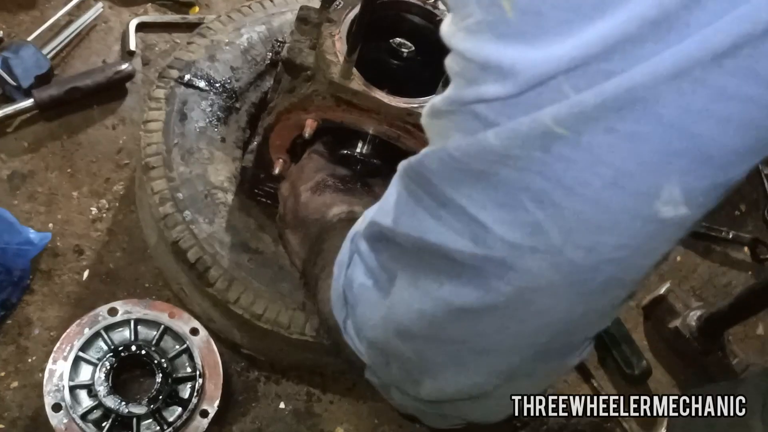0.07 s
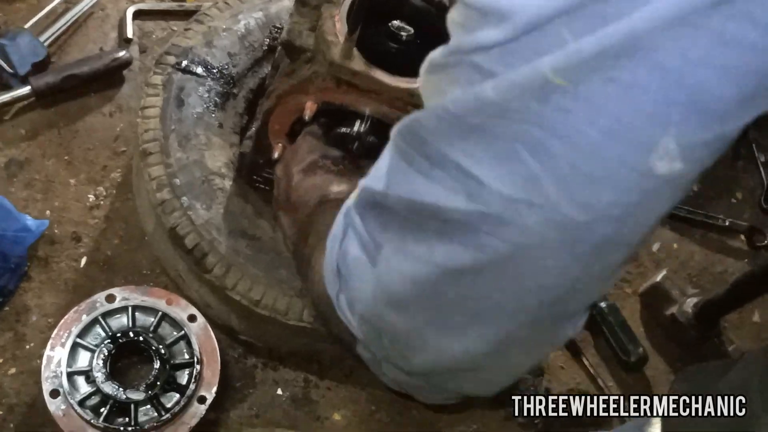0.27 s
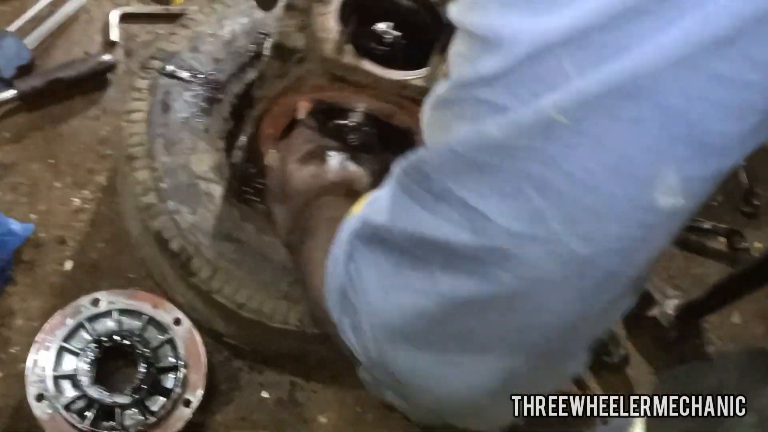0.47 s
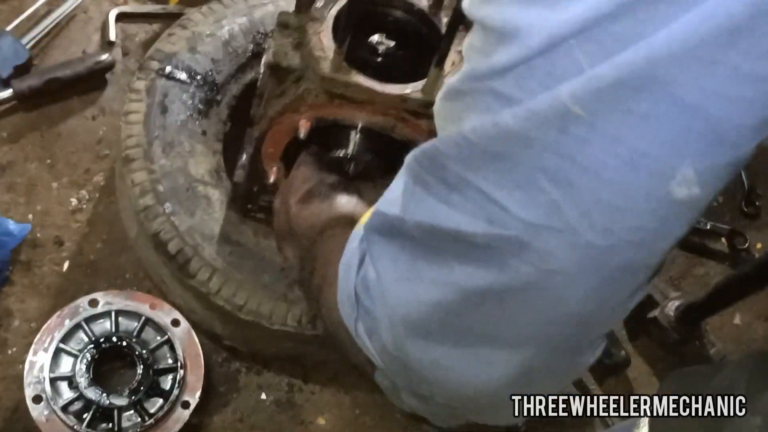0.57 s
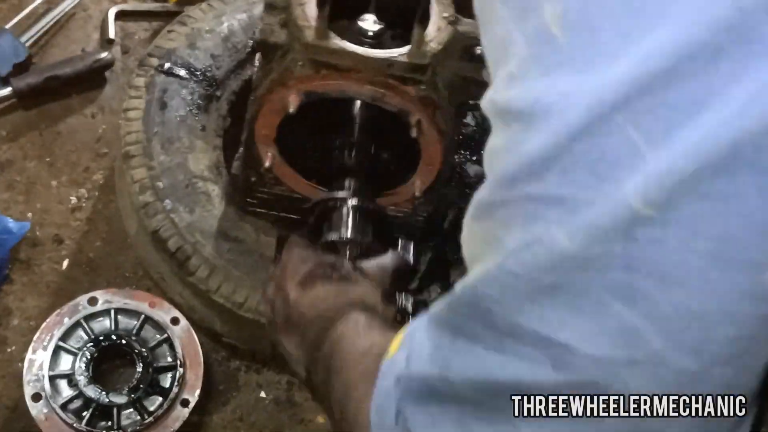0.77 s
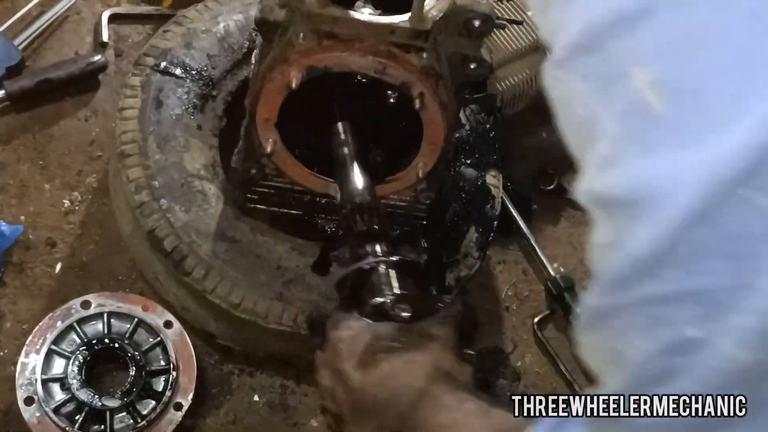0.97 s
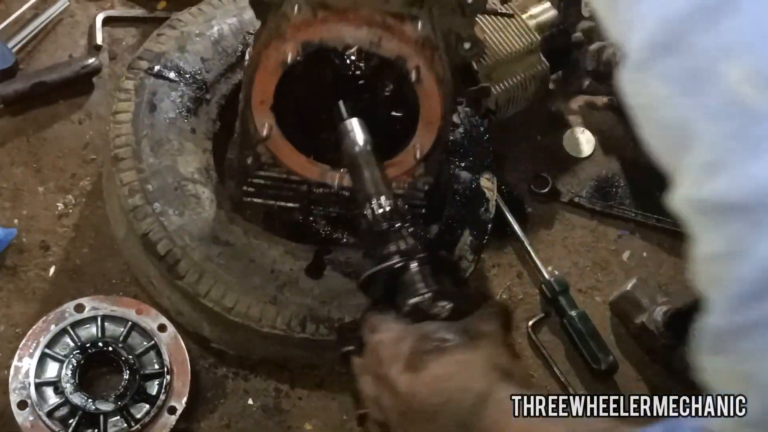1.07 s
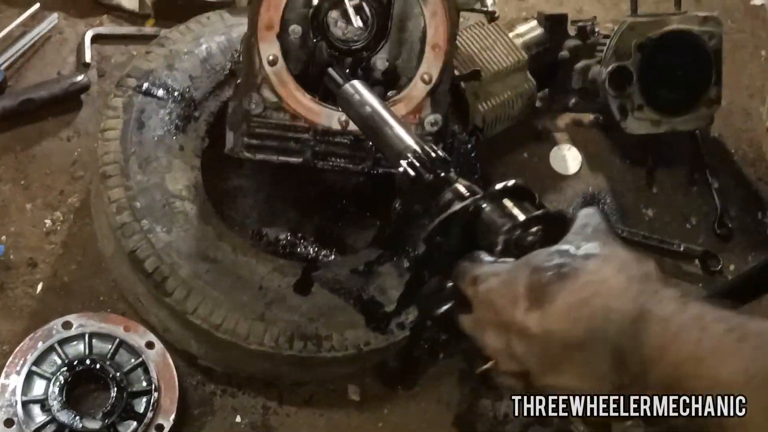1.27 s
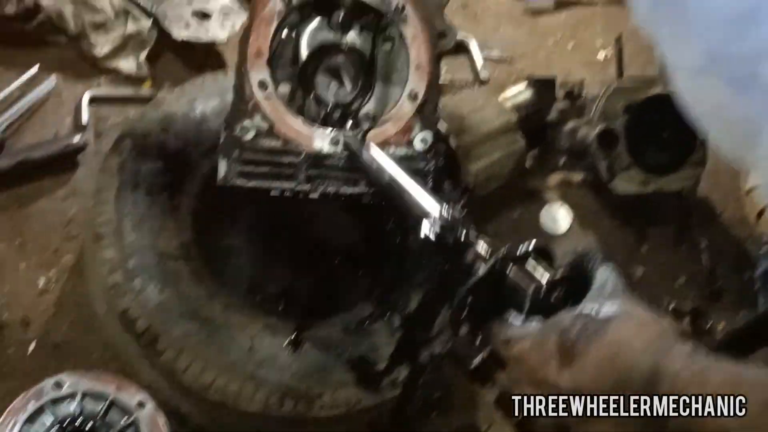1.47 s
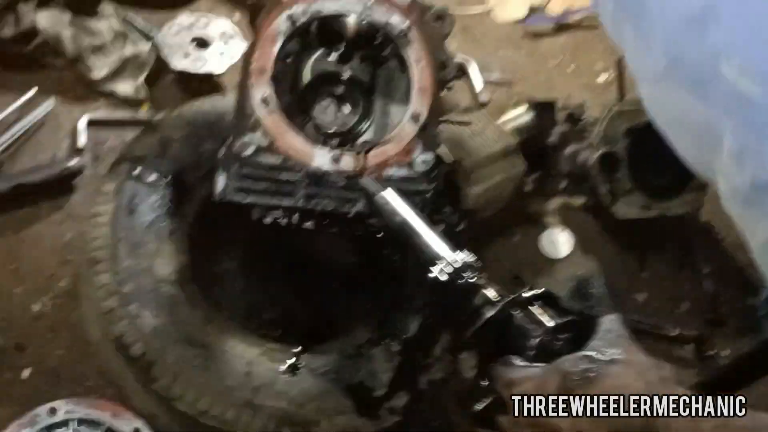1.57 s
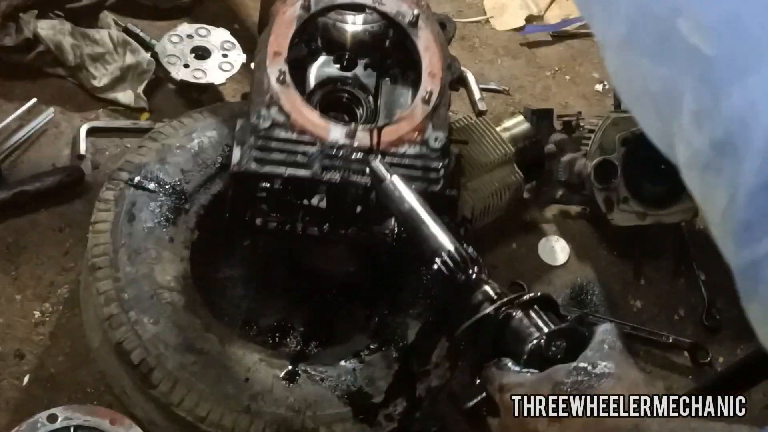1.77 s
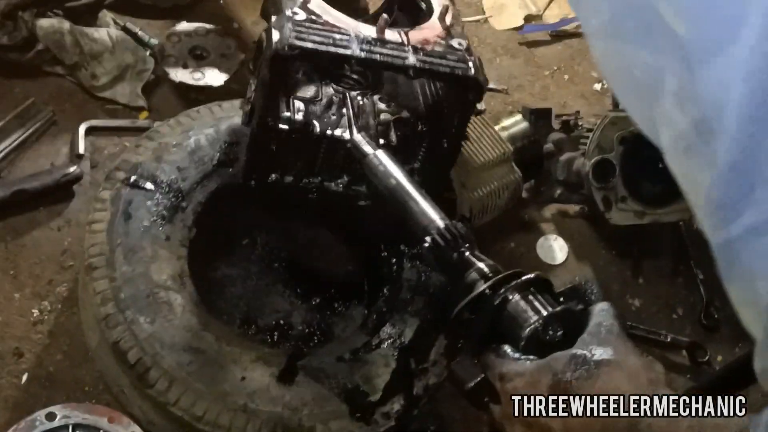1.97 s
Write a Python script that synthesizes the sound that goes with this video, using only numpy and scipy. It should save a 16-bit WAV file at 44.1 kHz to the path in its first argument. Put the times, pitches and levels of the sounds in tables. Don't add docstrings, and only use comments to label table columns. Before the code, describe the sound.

Steel gear parts and a shaft clank loudly against a casing in a quick cluster, then quiet ticks, a small knock and gritty scraping; close phone microphone, open workshop, faint distant engine and bird.

```python
import sys
import numpy as np
from scipy import signal
from scipy.fft import rfft, irfft, next_fast_len
from scipy.io import wavfile
from scipy.ndimage import uniform_filter1d

SR = 44100
rng = np.random.default_rng(int(sys.argv[2]) if len(sys.argv) > 2 else 0)


def master_out(mix):
    frames = np.transpose(np.atleast_2d(mix))
    ceiling = np.clip(frames, -1, 1)
    pcm = np.round(ceiling * 32767).astype(np.int16)
    wavfile.write(sys.argv[1], SR, pcm)


def level_to_linear(level):
    exponent = np.asarray(level, float) / 20
    return 10 ** exponent


N = 88949

# [f/Hz, level/dB, T60/s]
CLUSTER_MODES = [(273, 0, 0.14), (725, -6.5, 0.125), (1652, 2.5, 0.093), (1870, -3, 0.11),
                 (2126, 1.5, 0.068), (2435, -6, 0.16), (2827, -12, 0.2), (4170, -8, 0.11), (4584, -2, .15),
                 (5580, -11, 0.14), (6340, -15, 0.13), (9900, -18.5, 0.13), (10560, -19, .12),
                 (13140, -25.5, .12)]
CASING_MODES = [(272, 0.5, 0.073), (555, -1.5, 0.068), (756, -1.5, 0.076), (833, 5, 0.055),
                (957, -5.5, 0.055), (1065, -4.5, .1), (1210, -18.5, 0.83), (1248, -4.5, .1),
                (1590, -7, 0.14), (1952, -5, 0.076), (2783, 0, 0.065), (2863, -0.5, 0.14), (3000, -8, 0.12),
                (3425, -14.5, 0.15)]
RIB_MODES = [(2400, -4, 0.038), (3220, -13, 0.12), (4258, -7.5, 0.1), (4660, -10, 0.048),
             (6110, -19.5, 0.089), (7000, -42, 0.18), (8371, -31.5, 0.25), (9620, -26.5, 0.13),
             (10100, -23.5, 0.13), (11700, -26.5, 0.07), (13170, -24.5, 0.078)]
GEAR_MODES = [(269.5, -3, .13), (724, -0.5, 0.034), (862, -3.5, 0.08), (1073, -2.5, 0.073),
              (1648, 5.5, 0.025), (2717, -3.5, 0.077), (4585, -9, 0.037)]
SPLINE_MODES = [(285.5, -21, 0.85), (894, -16.5, 0.27), (1614, 1.5, 0.14), (2385, -15.5, 0.13),
                (2740, -15.5, 0.073), (3448, -7.5, 1), (3940, -16.5, 0.088), (4370, -17.5, 0.073),
                (8040, -21, 0.23), (9800, -13.5, 0.2), (10250, -20, 0.089), (13150, -29, 0.25)]
SHAFT_MODES = [(870, -18, 0.29), (1570, -11, 0.73), (2040, 0, 0.023), (2229, -19, 0.42),
               (2340, -2.5, 0.021), (3610, -14, 0.086), (3438, -2.5, 0.28), (4160, -26, 0.24),
               (4226, -19, 0.16), (5600, -16, 0.08), (6470, -10, 0.041), (8430, -17, 0.17),
               (10400, -22, 0.15), (13300, -28.5, 0.1)]
BLOCK_MODES = [(319.5, 2, 0.04), (583, -7, 0.081), (901, -8, 0.052), (1585, -2.5, 0.055),
               (1723, -2.5, 0.05), (1952, 7.5, 0.022), (2715, 9, 0.061), (3340, 2, 0.052),
               (3500, -5, 0.063), (4120, 0, 0.048), (4417, -0.5, 0.037), (4650, 2.5, .05)]
WASHER_MODES = [(8600, 3, 0.042), (9520, 4, 0.066), (11100, 0, 0.07), (12000, -5, 0.15), (12900, -9, .05)]
# [t/s, ring level/dB, clatter level/dB, clatter T60/s, hardness/(dB per octave)]
CLUSTER_BLOWS = [
    (0, -25, -19.5, 0.45, 0.5),
    (.018, -27, -17, 0.24, -1),
]
CASING_BLOWS = [
    (.09, -46, -36, .08, 0),
    (.1188, -17, -8, .115, 0),
]
GEAR_BLOWS = [
    (.231, -35.5, -33.5, 0.087, 8),
    (0.2374, -21.5, -19, 0.15, 0.5),
    (0.2875, -34, -26.5, 0.062, -1.5),
    (0.328, -47, -28, 0.14, 5),
]
SPLINE_BLOWS = [
    (0.4487, -38, -22, .04, 6),
    (.4655, -22, -26, 0.11, 3),
    (.488, -27, -27, 0.08, 3),
]
SHAFT_BLOWS = [
    (.5195, -21, -17, .045, 2),
]
BLOCK_BLOWS = [
    (0.962, -57.5, -42.5, 0.089, 0),
    (1.4239, -40, -24.5, 0.059, -0.44),
    (1.716, -55.5, -35, 0.31, 0.46),
]
WASHER_BLOWS = [
    (0.756, -74, -84, .03, 6),
    (.927, -58, -67, 0.044, 7.1),
    (.961, -56.5, -66.5, .04, 6.8),
]
# [t/s], in the order cluster, casing, gears, splines, shaft, block, washer
LAST_FREE_S = [0.021, 0.16, 0.052, 0.066, 0.14, 0.029, 0.03]
PARTNER_STRENGTH = [1.5, 2.2, 1.5, .6, .3, 2, 1]
# [t/s, f/Hz, level/dB, T60/s, free ringing/s]
PINGS = [(0.29, 2229, -35, 0.26, 0.028), (0.312, 4550, -39, 0.15, 0.015), (0.341, 3445, -46, 1, 0.19),
         (0.394, 1640, -37.5, 0.19, 0.026), (0.435, 1590, -34, 0.2, 0.0097),
         (0.449, 2380, -16.5, 0.015, .02), (0.307, 1581, -43, 0.39, 0.063), (.409, 3500, -41, 0.091, 0.016),
         (0.418, 1600, -43, 0.36, 0.051), (0.324, 2400, -28, 0.029, .02), (0.961, 2080, -40, 0.034, .015),
         (0.961, 2684, -47, .04, .015), (1.589, 1554, -44.5, 0.42, 0.022), (1.71, 1075, -49.5, 0.25, .03),
         (1.944, 2435, -54, 0.89, 0.096)]
# [t/s, f/Hz, level/dB, T60/s, free ringing/s]
GLINTS = [
    (0.793, 15500, -68.5, 2, .09),
    (0.799, 9380, -43.5, 0.29, 0.023),
    (0.798, 13300, -66, .6, .06),
    (0.812, 13670, -62, 1, 0.055),
    (0.817, 11600, -62, 1, 0.064),
    (0.848, 6370, -63.5, 0.91, .06),
]
# [f/Hz, level/dB per Hz]
CLATTER_SPECTRUM = [(150, -10), (300, -5.5), (900, -4.5), (2900, 2.5), (4650, -9.5), (5100, -4),
                    (11500, -22), (15000, -41)]
GRIT_SPECTRUM = [(180, -6), (300, -2.5), (732, -17), (2700, 1.5), (6570, -4.5), (8150, -19.5), (12100, -9),
                 (15500, -43)]
SLIDE_SPECTRUM = [(3000, -72), (5200, -8.5), (7800, -2), (10500, 0.5), (14300, -11.5), (15500, -20)]
# [f/Hz, width/Hz, level/dB]
SLIDE_BANDS = [(4830, 250, 21.5), (5950, 130, 8), (9830, 640, 11), (11600, 580, 9.5), (14200, 450, 11)]
# [start t/s, peak t/s, end t/s, level/dB, brightness/(0-1)]
STROKES = [
    (0.322, 0.387, 0.45, -42.5, 0.68),
    (1.348, 1.48, 2.2, -53, 0.36),
    (1.61, 1.719, 1.728, -42.5, 0.14),
    (1.676, 1.796, 1.783, -39, 0.39),
    (1.759, 1.819, 1.963, -40, 0.29),
    (1.902, 2.025, 2.23, -48.5, .1),
]
# [t/s, f/Hz, level/dB, length/s]
THUMPS = [
    (0, 46, -41, 0.021),
    (0.116, 60, -60, 0.033),
    (0.851, 119, -49, 0.029),
    (1.193, 25.8, -49, 0.058),
    (1.593, 77, -46, 0.031),
    (1.671, 83, -48, 0.03),
]
# [t/s, load/(0-1)]
FIRING_RATE = [(0, 37.61), (.9, 39.14), (1.35, 37.6), (1.6, 36.27), (2.02, 35.68)]
ENGINE_LOAD = [(0, 0.9), (1.15, 0.05), (1.27, 1), (2.02, 0.41)]
# [multiple of firing rate, coasting level/dB, loaded level/dB]
ENGINE_ORDERS = [(3, -54, -79), (4, -82.5, -50.5), (5, -66, -58)]
# [f/Hz, level/dB per Hz]
YARD_SPECTRUM = [(12, -75.5), (20, -24.5), (140, -15.5), (1270, -38), (1580, -30), (6190, -34.5),
                 (8410, -23), (15500, -54)]
# [t/s, length/s, start f/Hz, end f/Hz, level/dB]
CHIRPS = [
    (0.71, 0.027, 4000, 3820, -52),
    (1.256, 0.099, 4145, 3860, -51),
]
# [f/Hz, level/dB]
NEAR_SIDE = [(60, -2), (240, -19.5), (950, -4), (3770, 0), (15000, 0.5)]
FAR_SIDE = [(60, -10), (380, -9.5), (2380, 1), (15000, -1)]
# [f/Hz, level/dB]
NEAR_PAN = [(60, -5), (380, 1), (2380, -4.5), (15000, -9)]
FAR_PAN = [(60, -10), (380, -2), (2380, -2), (15000, -4.5)]
# [f/Hz, width/Hz, level/dB]
MICROPHONE_HUMPS = [(4327, 190, 3.5), (8820, 2760, -7), (7760, 313, -8.5)]

NEAR_LIKENESS, FAR_LIKENESS = 0.6, 0.45
ROOM_T60_S, ROOM_DB = 0.18, -13
DAMP_DB = 32.5
RING_RISE_S, PING_RISE_S, GLINT_RISE_S = 0.0012, 0.004, 0.013
PARTNER_SPREAD, FULL_SPLIT_HZ = 0.01, 8000
RATTLE_DB, RATTLE_S = 2.2, 0.006
CLATTER_TILT, TICK_DB, TICK_S = 0.13, 3, 0.0005
GRAINS_PER_S, GRAIN_SPREAD_DB = 5000, 1.6
SLIDE_ENDS_S = 0.5
ORDER_WIDTH_HZ = 5
YARD_DB = -52.5


def evened(x):
    return x / np.sqrt(np.mean(x ** 2) + 1e-20)


def read(points, hz):
    f, value = np.transpose(points)
    return np.interp(np.log(hz + 1), np.log(f + 1), value)


def add(mix, s, sound):
    section = mix[max(round(s * SR), 0):][:len(sound)]
    section += sound[:len(section)]


def coloured(x, spectrum, tilt_db=0):
    hz = np.fft.rfftfreq(len(x), 1 / SR)
    gain = level_to_linear(read(spectrum, hz) + tilt_db * np.log2(hz + 20))
    return evened(irfft(rfft(x) * gain, len(x)))


def tail(x, t60, start):
    t = np.arange(round(0.3 * SR)) / SR
    signs = rng.choice([-1., 1.], len(t))
    present = (rng.random(len(t)) < 0.05) * (t >= start)
    taps = signs * present * level_to_linear(-60 * t / t60)
    return signal.fftconvolve(x, taps / np.linalg.norm(taps))[:N]


def ports(x, scattered, side, pan, like):
    size = next_fast_len(N)
    hz = np.fft.rfftfreq(size, 1 / SR)
    side_gain = level_to_linear(read(side, hz))
    balance = level_to_linear(2 * read(pan, hz))
    lean = (1 + side_gain ** 2) / (2 * side_gain * like) * (balance - 1) / (balance + 1)
    lean = np.clip(lean, -1, 1)
    turn = lean + 1j * np.sqrt(1 - lean ** 2)
    coherent = like * turn * rfft(x, size)
    incoherent = np.sqrt(1 - like ** 2) * rfft(scattered, size)
    diff = irfft(side_gain * (coherent + incoherent), size)[:N]
    return np.array([x + diff, x - diff])


def contact_damping(t, free_s):
    return -DAMP_DB / free_s * np.maximum(t - free_s, 0)


def ring(modes, db, free_s, rise_s, split=1):
    t = np.arange(round(0.35 * SR)) / SR
    hz, mode_db, t60 = np.transpose(modes)[:, :, None]

    def tone(spread):
        detuned = hz * (1 + spread * rng.uniform(-1.14, 1, hz.shape))
        return np.sin(2 * np.pi * (detuned * t + rng.random(hz.shape)))

    partner_gain = split * np.minimum(hz / FULL_SPLIT_HZ, 1) ** 3
    group = tone(0) + partner_gain * (tone(PARTNER_SPREAD) + tone(2 * PARTNER_SPREAD))
    shaking = rng.standard_normal(group.shape)
    rattle = evened(uniform_filter1d(shaking, size=round(RATTLE_S * SR), axis=1))
    decay_db = mode_db - 60 * t / np.clip(t60, 0.01, 2)
    tones = group * level_to_linear(decay_db + split * RATTLE_DB * rattle)
    rise = np.minimum(t / rise_s, 1)
    return np.sqrt(2) * tones.sum(0) * rise * level_to_linear(db + contact_damping(t, free_s))


def clatter(db, t60, hard_db, free_s):
    t = np.arange(8192) / SR
    noise = coloured(rng.standard_normal(len(t)), CLATTER_SPECTRUM, hard_db)
    out = 0
    for lo, hi in [(150, 600), (600, 2000), (2000, 5500), (5500, 20000)]:
        band_filter = signal.butter(2, [lo, hi], "bandpass", fs=SR, output="sos")
        centre_hz = np.sqrt(lo * hi)
        band_t60 = max(t60, 0.01) * (1000 / centre_hz) ** CLATTER_TILT
        out = out + signal.sosfilt(band_filter, noise) * level_to_linear(-60 * t / band_t60)
    tick_db = TICK_DB * np.exp(-t / TICK_S)
    rise = np.minimum(t / RING_RISE_S, 1)
    return out * rise * level_to_linear(db + tick_db + contact_damping(t, free_s))


def part(modes, blows, last_free_s, split):
    out = np.zeros(N)
    starts = [blow[0] for blow in blows]
    free_times = [*np.diff(starts), last_free_s]
    for (s, ring_db, clatter_db, t60, hard_db), free_s in zip(blows, free_times):
        add(out, s, ring(modes, ring_db, free_s, RING_RISE_S, split))
        add(out, s, clatter(clatter_db, t60, hard_db, free_s))
    return out


def pings(out):
    for s, hz, db, t60, free_s in PINGS:
        modes = [(hz, 0, t60), (1.04 * hz, -7, t60 / 2)]
        add(out, s, ring(modes, db, free_s, min(PING_RISE_S, t60 / 20), split=0.5))


def glints(out):
    for s, hz, db, t60, free_s in GLINTS:
        add(out, s, ring([(hz, 0, t60)], db, free_s, GLINT_RISE_S, split=0))


def metal():
    modes = [CLUSTER_MODES, CASING_MODES + RIB_MODES, GEAR_MODES, SPLINE_MODES, SHAFT_MODES, BLOCK_MODES,
             WASHER_MODES]
    blows = [CLUSTER_BLOWS, CASING_BLOWS, GEAR_BLOWS, SPLINE_BLOWS, SHAFT_BLOWS, BLOCK_BLOWS, WASHER_BLOWS]
    parts = [part(*row) for row in zip(modes, blows, LAST_FREE_S, PARTNER_STRENGTH)]
    pings(parts[3])
    glints(parts[6])
    parts = signal.sosfilt(signal.butter(2, 150, "high", fs=SR, output="sos"), parts)
    wet = [x + level_to_linear(ROOM_DB) * tail(x, ROOM_T60_S, 0.01) for x in parts]
    return sum(ports(x, tail(x, 0.04, 0), NEAR_SIDE, NEAR_PAN, NEAR_LIKENESS) for x in wet)


def thumps():
    out = np.zeros(N)
    for s, hz, db, length in THUMPS:
        t = np.arange(0, length, 1 / SR)
        push = np.sin(np.pi * t / length) ** 2
        add(out, s, 2 * level_to_linear(db) * push * np.sin(2 * np.pi * hz * t))
    return out


def engine():
    t = np.arange(N) / SR
    turns = np.cumsum(np.interp(t, *np.transpose(FIRING_RATE))) / SR
    load = np.interp(t, *np.transpose(ENGINE_LOAD))
    pole = np.exp(-np.pi * ORDER_WIDTH_HZ / SR)
    out = 0
    for multiple, idle_db, load_db in ENGINE_ORDERS:
        drift = evened(signal.lfilter([1], [1, -pole], rng.standard_normal(N)))
        level = np.sqrt(2) * level_to_linear(idle_db + (load_db - idle_db) * load)
        tone = np.sin(2 * np.pi * (multiple * turns + rng.random()))
        out = out + level * (1 + 0.45 * drift) * tone
    return out


def yard():
    frames, hz = N // 256 + 5, np.fft.rfftfreq(1024, 1 / SR)
    real, imaginary, patches = rng.standard_normal((frames, 513, 3)).T
    patches = evened(uniform_filter1d(uniform_filter1d(patches, 14, 0), 14, 1))
    level_db = read(YARD_SPECTRUM, hz)[:, None] + 1.5 * patches
    z = (real + 1j * imaginary) * level_to_linear(level_db)
    noise = signal.istft(z, nperseg=1024, noverlap=768)[1][:N]
    return level_to_linear(YARD_DB) * evened(noise)


def slide(grains):
    hz, frame_s, z = signal.stft(coloured(grains, SLIDE_SPECTRUM), SR, nperseg=256)
    patches = uniform_filter1d(rng.standard_normal(z.shape), size=5, axis=0)
    patches = evened(uniform_filter1d(patches, size=8, axis=1))
    bands_db = sum(db * np.exp(-((hz - f) / w) ** 2) for f, w, db in SLIDE_BANDS)
    bands_db = bands_db[:, None] * (frame_s < SLIDE_ENDS_S)
    return signal.istft(z * level_to_linear(5.5 * patches + bands_db), nperseg=256)[1][:N]


def scrapes():
    t = np.arange(N) / SR
    noise = rng.standard_normal(N)
    size_db = GRAIN_SPREAD_DB * np.minimum(rng.exponential(1, N), 3)
    catches = rng.random(N) < GRAINS_PER_S / SR
    grains = noise * level_to_linear(size_db) * (0.66 + catches)
    dull, bright = coloured(grains, GRIT_SPECTRUM), slide(grains)
    out = 0
    for start, peak, end, db, shine in STROKES:
        arch = np.sin(np.pi / 2 * np.interp(t, [start, peak, end], [0, 1, 0])) ** 2
        shine = np.clip(shine, 0, 1)
        out = out + level_to_linear(db) * arch * ((1 - shine) * dull + shine * bright)
    return out


def bird():
    out = np.zeros(N)
    for s, length, hz0, hz1, db in CHIRPS:
        t = np.arange(0, length, 1 / SR)
        blur = 0.5 + evened(uniform_filter1d(rng.standard_normal(8192), 140))[:len(t)]
        cycles = hz0 * t + (hz1 - hz0) * t ** 2 / (2 * length)
        add(out, s, level_to_linear(db) * blur * np.sin(np.pi * t / length) * np.sin(2 * np.pi * cycles))
    return out


def scene():
    low = thumps() + bird() + engine()
    near = metal()
    direct = low + scrapes() + yard()
    scattered = low + scrapes() + yard()
    return near + ports(direct, scattered, FAR_SIDE, FAR_PAN, FAR_LIKENESS)


def roll_off(x):
    return signal.sosfilt(signal.butter(12, 15660, fs=SR, output="sos"), x)


def record(dry):
    hz = np.fft.rfftfreq(N, 1 / SR)
    colour_db = sum(db * np.exp(-((hz - f) / w) ** 2) for f, w, db in MICROPHONE_HUMPS)
    heard = irfft(rfft(dry, axis=1) * level_to_linear(colour_db), N, axis=1)
    return roll_off(np.tanh(heard))


dry = scene()
out = record(dry)
master_out(out)
```